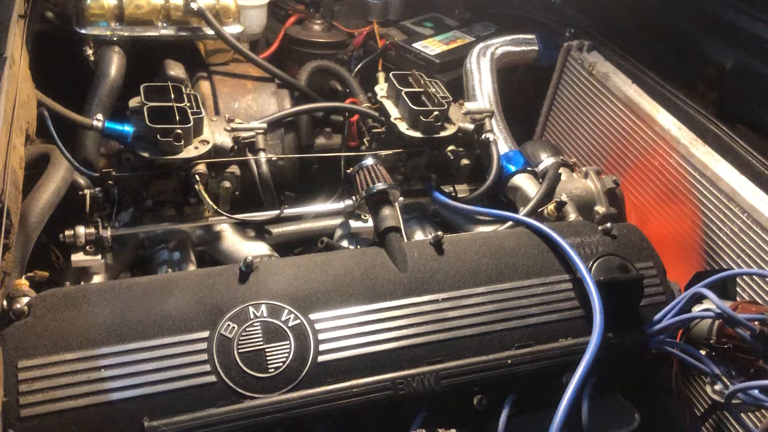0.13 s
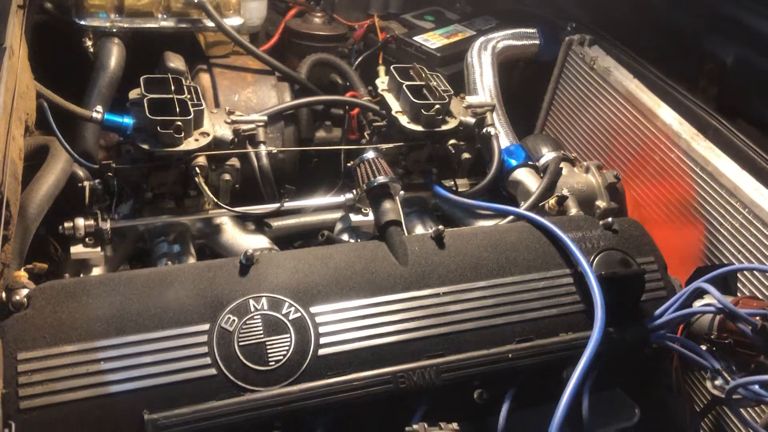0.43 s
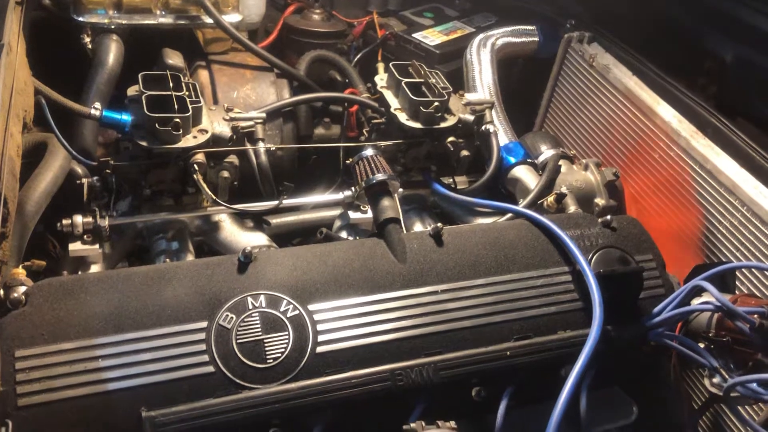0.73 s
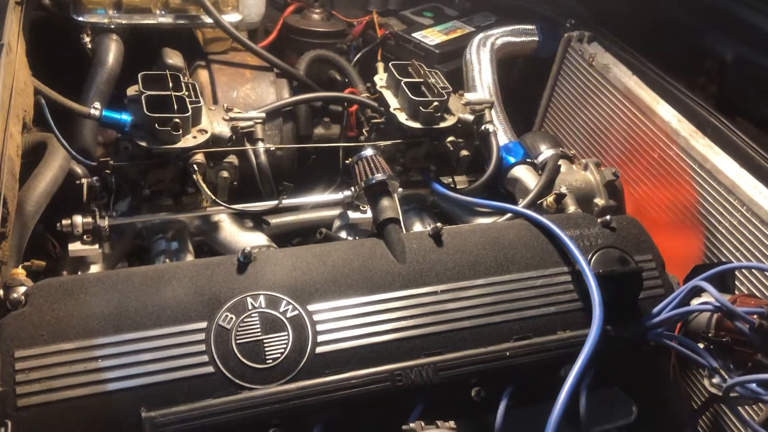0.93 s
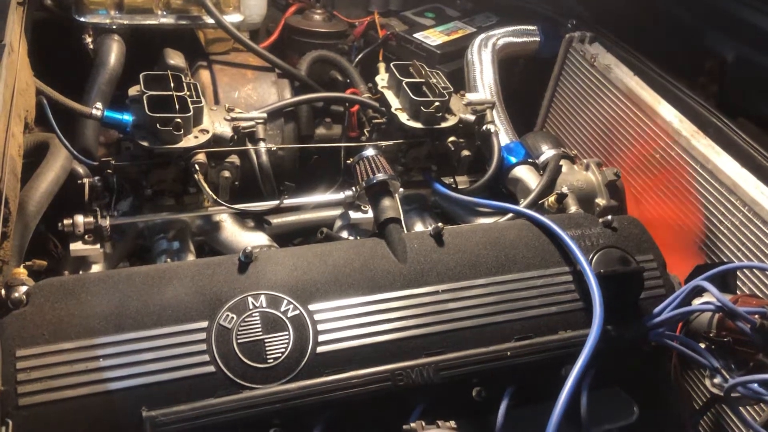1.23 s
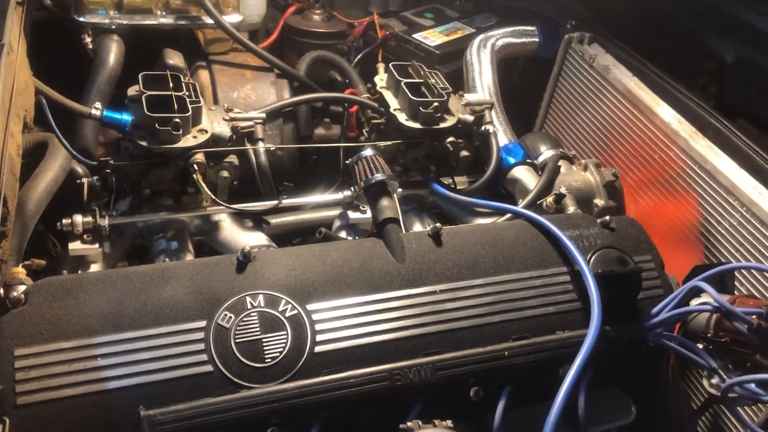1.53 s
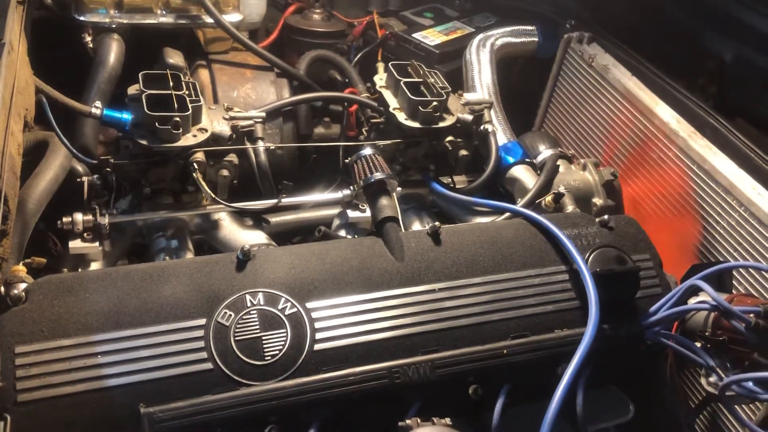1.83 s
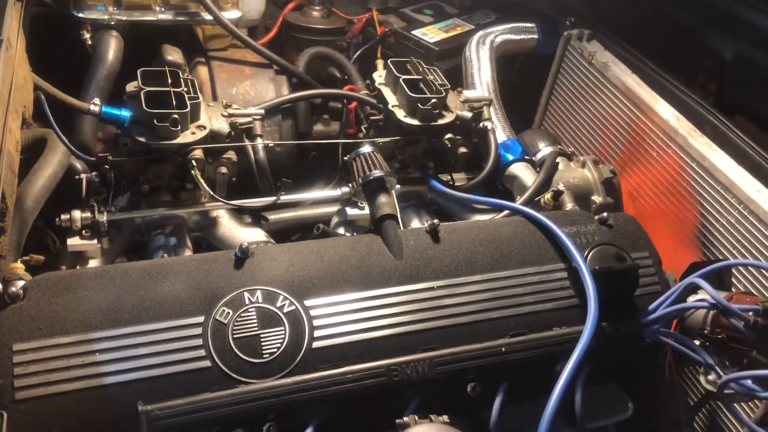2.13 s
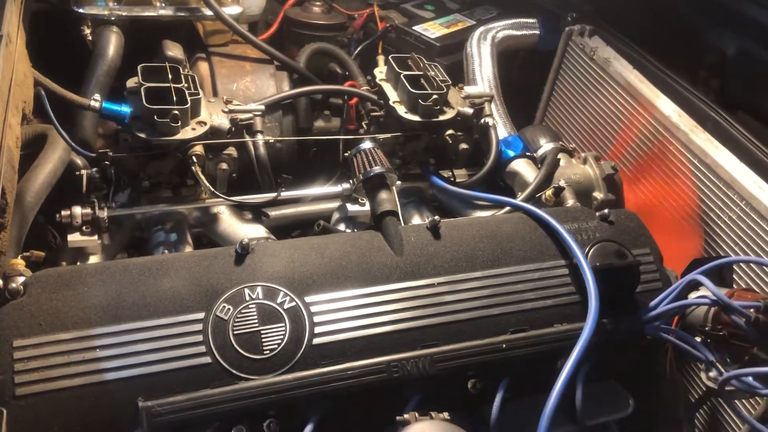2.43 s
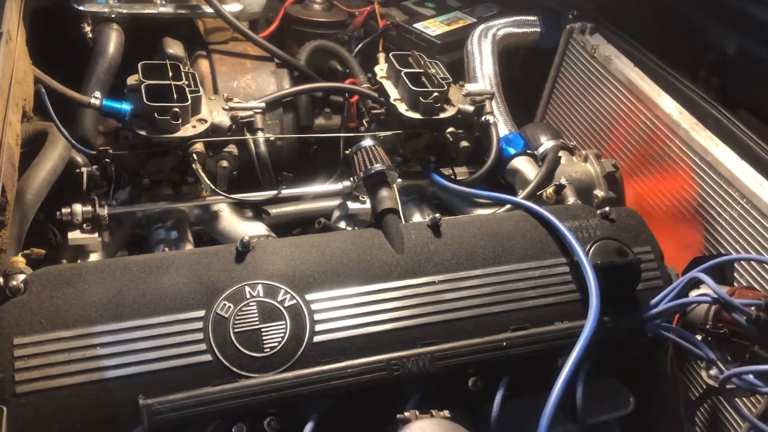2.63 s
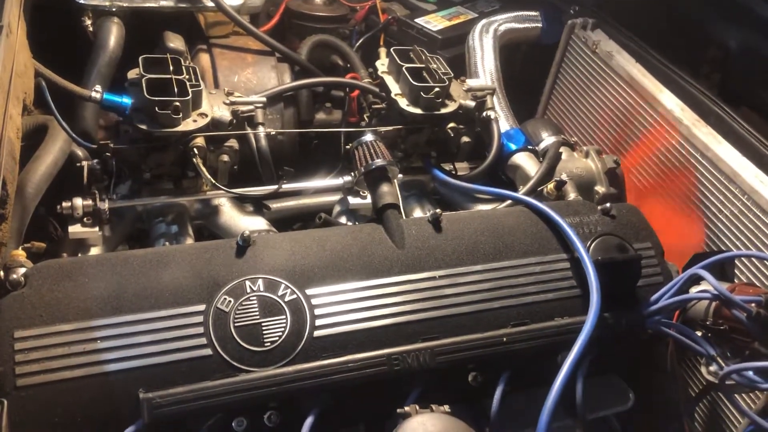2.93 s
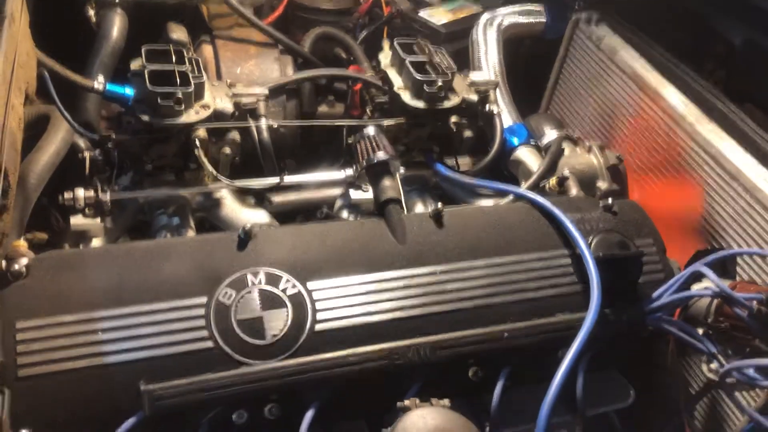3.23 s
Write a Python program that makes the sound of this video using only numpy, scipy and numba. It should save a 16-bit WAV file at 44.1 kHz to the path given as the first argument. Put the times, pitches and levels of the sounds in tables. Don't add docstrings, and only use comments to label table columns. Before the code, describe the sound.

A car engine idles steadily up close, low throbbing rumble under rapid metallic valve ticking.

```python
import sys
import numpy as np
from scipy import signal
from scipy.fft import rfft, irfft
from scipy.io import wavfile
from scipy.ndimage import uniform_filter1d, map_coordinates
from numba import njit

SR = 44100
rng = np.random.default_rng(int(sys.argv[2]) if len(sys.argv) > 2 else 0)


def attenuation_scalar(level_db):
    decades = np.asarray(level_db, float) / 20
    return 10 ** decades


def inscribe(sig):
    pcm = np.round(np.clip(np.atleast_2d(sig).T, -1, 1) * 32767)
    wavfile.write(sys.argv[1], SR, pcm.astype(np.int16))


N = 149940

# time_s, level_db
CAM_TURNS = [(0.1673, -25), (0.2965, -24.5), (0.4214, -25.5), (0.5485, -26), (0.6761, -27.5), (0.8203, -27),
             (0.9619, -26.5), (1.0925, -24.5), (1.2211, -24), (1.3537, -25), (1.48, -23.5), (1.6088, -24),
             (1.7331, -23.5), (1.8637, -25.5), (1.9903, -25.5), (2.1196, -27), (2.2534, -24.5),
             (2.384, -25.5), (2.5096, -24), (2.6353, -24.5), (2.7579, -24.5), (2.8824, -24.5),
             (3.0055, -25.5), (3.1285, -24), (3.255, -25.5), (3.3832, -25)]


def level(x, db):
    return x * attenuation_scalar(db) / np.sqrt(np.mean(x ** 2))


@njit
def svf(x, hz, width):
    y, band, low = np.empty(len(x)), 0., 0.
    g, damping = np.tan(np.pi * hz / SR), width / hz
    for i in range(len(x)):
        v = (band + g * (x[i] - low)) / (1 + g * (g + damping))
        band, low, y[i] = 2 * v - band, low + 2 * g * v, damping * v
    return y


def ring(x, hz, width):
    once = svf(x, 1. * hz, 1. * width)
    return svf(once, 1. * hz, 1. * width)


def colour(x, shape):
    hz, db = np.array(shape).T
    f = np.maximum(np.arange(N // 2 + 1) * SR / N, 1)
    gain = attenuation_scalar(np.interp(np.log(f), np.log(hz), db, left=-90, right=-90))
    return irfft(rfft(x) * gain, N)


def coloured_noise(shape, db):
    return level(colour(rng.standard_normal(N), shape), db)


def walk(rate):
    k = int(SR / rate)
    steps = np.repeat(rng.standard_normal(N // k + 1), k)
    return 1.3 * uniform_filter1d(uniform_filter1d(steps, k), k)[:N]


def follow(points):
    return attenuation_scalar(np.interp(np.arange(N) / SR, *np.array(points).T))


def when(share):
    t = np.array(CAM_TURNS)[:, 0]
    before = [3 * t[0] - 2 * t[1], 2 * t[0] - t[1]]
    after = [2 * t[-1] - t[-2], 3 * t[-1] - 2 * t[-2]]
    t = np.r_[before, t, after]
    return map_coordinates(t, [np.arange(1, len(t) - 2) + share], mode="nearest")


def slowing(t):
    idle_turn_s = .127
    turns = np.array(CAM_TURNS)[:, 0]
    return np.interp(t, (turns[1:] + turns[:-1]) / 2, np.diff(turns) / idle_turn_s - 1)


def spikes(times, db):
    x, k = np.zeros(N), (times * SR).astype(int)
    np.add.at(x, k[k < N], attenuation_scalar(db)[k < N])
    return x


def fade(x, seconds):
    return signal.lfilter([1], [1, -np.exp(-1 / (seconds * SR))], x)


def strike(times, db, hz, width):
    return ring(spikes(times, db), hz, width) * SR * np.e / (2 * np.pi * width)


def buffet():
    # freq_hz, density_db
    rumble = [(25, -35), (38, 3.5), (65, 4.5), (85, -7), (125, 6), (175, -14.5), (215, -38), (260, -26)]
    return coloured_noise(rumble, -23.5)


def roar():
    # freq_hz, density_db
    belts = [(200, 5), (300, -4.5), (450, -6), (651, -11.5), (1100, -9), (1900, -22), (2300, -14.5),
             (7160, -31)]
    # freq_hz, density_db
    hiss = [(2000, -11), (3500, -15), (7000, -7), (10000, -7), (12500, -27.5), (14500, -22), (15700, -22)]
    # freq_hz, width_hz, level_db
    block = [(425, 47, -59), (800, 180, -46), (1115, 70, -48), (1261, 236, -42.5), (1655, 340, -44),
             (7270, 840, -62), (11400, 900, -69.5)]
    out = coloured_noise(belts, -36) * attenuation_scalar(.4 * walk(5) + 1.5 * walk(90))
    out = out + coloured_noise(hiss, -58.5) * attenuation_scalar(2.5 * walk(120))
    for hz, width, db in block:
        mode = level(ring(rng.standard_normal(N), hz, width), db)
        out = out + mode * attenuation_scalar(.6 * walk(6) + 1.5 * walk(50))
    return out


def intake(pulses):
    # freq_hz, width_hz, level_db
    trumpets = [(237, 10.8, -7.5), (284.1, 12.4, 0.5), (337.5, 22.8, -1.2)]
    # time_s, level_db
    swells = [(0.14, -42.5), (0.31, -31), (0.84, -48), (0.98, -27), (1.01, -34), (1.12, -32.5), (1.2, -40),
              (1.49, -35.5), (1.54, -41.5), (1.59, -36.5), (1.91, -44.5), (1.99, -31.5), (2.05, -42),
              (2.66, -31.5), (2.74, -46.5), (3.18, -31), (3.2, -38), (3.38, -38.5)]
    air = level(pulses, 0) + attenuation_scalar(-0.5) * rng.standard_normal(N)
    hum = sum(attenuation_scalar(db) * ring(air, hz, width) for hz, width, db in trumpets)
    return level(hum, -0.33) * follow(swells)


def tappets():
    # turn_share, click_db, fade_s, ring_hz, ring_db
    ticks = [
        (0.0, 0.94, .004, 8800, -19.5),
        (0.183, -6.5, 0.0046, 5550, 2.5),
        (0.333, -7.5, 0.0051, 6900, -2.5),
        (0.507, -11, 0.009, 6050, -6),
        (.69, -5, 0.0079, 3230, 7),
        (0.858, -12.5, 0.0093, 5150, 0),
    ]
    # turn_share, level_db
    knocks = [(.012, -35), (.19, -36), (.335, -38), (.535, -33), (.725, -37), (.89, -31)]
    # freq_hz, width_hz, level_db, delay_s
    loose_rings = [(1270, 630, -30, .002), (2547, 92, -35, .003), (3980, 290, -30.5, 0.0022),
                   (6140, 500, -33.5, 0.0049)]
    # freq_hz, gain_db
    click = [(1000, 7.5), (2500, -5), (5000, -4), (7000, -7.5), (10000, -13), (12500, -17.5), (15500, -29)]
    tick_db, scatter_db, jitter_s = -33, 1.3, .00071
    rise_s, tail_s, tail_db = .0007, .011, -8

    loose_db = np.array(CAM_TURNS)[:, 1]
    loose_db = np.r_[0, loose_db - loose_db.mean()]
    out = 0
    for k, ((share, db, fade_s, hz, ring_db), (knock, knock_db)) in enumerate(zip(ticks, knocks)):
        loose = k == 0
        t = when(share)
        chance = rng.standard_normal((len(t), 7)).T
        if loose:
            hit = spikes(t, tick_db + db + loose_db)
        else:
            hit = spikes(t + jitter_s * chance[0], tick_db + db + scatter_db * chance[1])
        rise = fade(hit, rise_s)
        shape = fade(hit, fade_s) - rise + attenuation_scalar(tail_db) * (fade(hit, tail_s) - rise)
        grit = shape * rng.standard_normal(N)
        out = out + colour(grit, click) * attenuation_scalar(8.5)
        out = out + attenuation_scalar(ring_db + 6.5) * svf(grit, 1. * hz, hz * 0.062)
        out = out + strike(when(knock), knock_db + 2.5 * chance[2], 1850, 190)
        if loose:
            for (f, width, d, delay_s), r in zip(loose_rings, chance[3:]):
                out = out + strike(t + delay_s, d + loose_db + 0.5 * r, f, width)
    return out


def firings():
    cylinder_db = [-4.5, -1, -18, 0, -10, 0]
    first_share, jitter_s, scatter_db = .09, .0002, 2.3
    pulses = 0
    for k, db in enumerate(cylinder_db):
        t = when(first_share + k / len(cylinder_db))
        chance = rng.standard_normal((len(t), 2)).T
        pulses = pulses + spikes(t + jitter_s * chance[0], db + scatter_db * chance[1])
    return pulses


def silencer_boom(pulses):
    lag_s, db_per_slowing = 0.042, 81
    t = np.arange(N) / SR
    return level(ring(pulses, 119.7, 23), -34) * attenuation_scalar(db_per_slowing * slowing(t - lag_s))


def exhaust(pulses):
    # freq_hz, width_hz, level_db
    pipe_modes = [(62, 22, -13), (95, 22, -10), (121, 15, -1), (125, 22, -9), (141, 20, -2), (168, 17, 3.5),
                  (140, 100, -7)]
    # time_s, level_db
    effort = [(0.14, -14), (0.65, -12.5), (0.73, -19), (0.77, -20.5), (0.82, -12), (1.52, -13), (1.56, -16),
              (1.6, -17), (1.88, -10.5), (1.93, -10.5), (2.03, -14.5), (3.23, -12), (3.33, -22),
              (3.38, -12.5)]
    top_hz = 171.3
    pipe = sum(attenuation_scalar(db) * ring(pulses, hz, width) for hz, width, db in pipe_modes)
    muffled = colour(pipe, [(20, 0), (top_hz, 0), (1.57 * top_hz, -18), (2000, -40)])
    return level(muffled, -1.5) * follow(effort)


def scene():
    start_s, fade_in_s, roar_db_per_slowing = .1205, .001, -13
    t = np.arange(N) / SR
    pulses = firings()
    low = exhaust(pulses) + silencer_boom(pulses) + intake(pulses) + buffet()
    high = (tappets() + roar()) * attenuation_scalar(roar_db_per_slowing * slowing(t))
    fade_in = np.clip((t - start_s) / fade_in_s, 0, 1)
    return ((low + high) * fade_in)[None]


def top_cut(x):
    return signal.sosfilt(signal.butter(12, 15710, fs=SR, output="sos"), x)


def record(dry):
    mix = np.tanh(.4 * dry) / .4
    return top_cut(mix)


dry = scene()
out = record(dry)
inscribe(out)
```